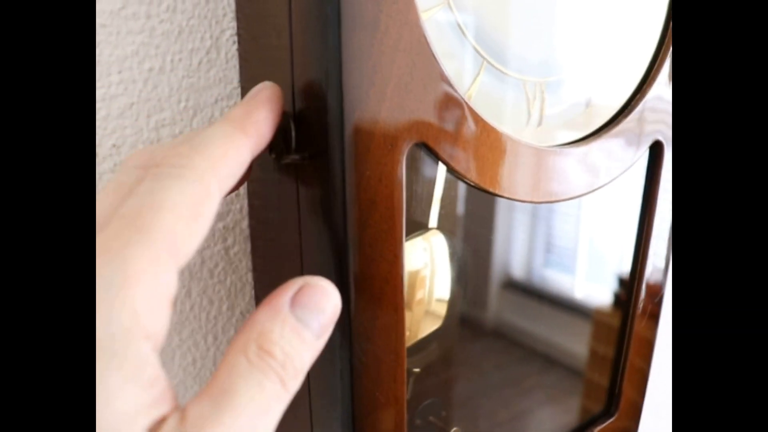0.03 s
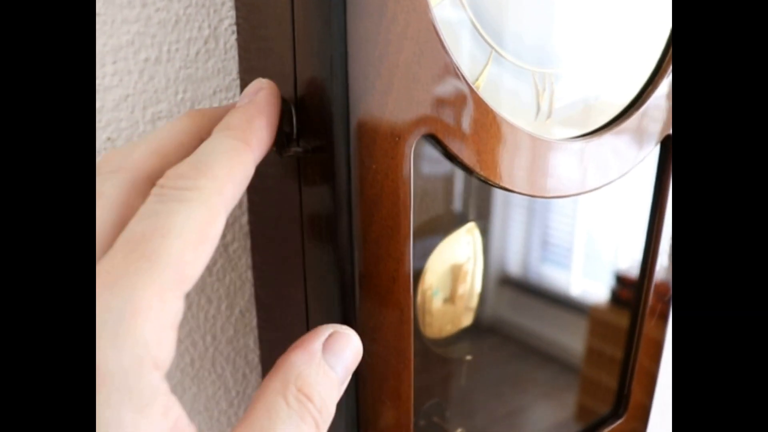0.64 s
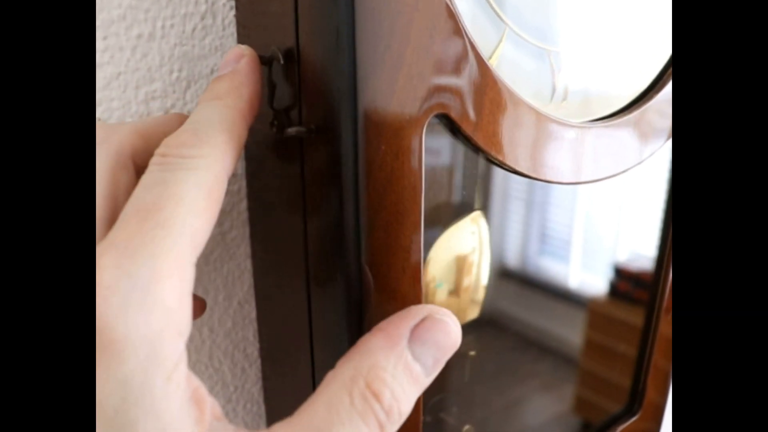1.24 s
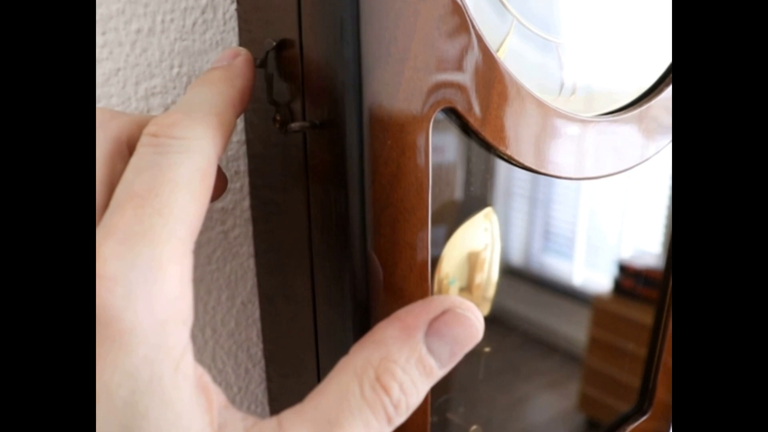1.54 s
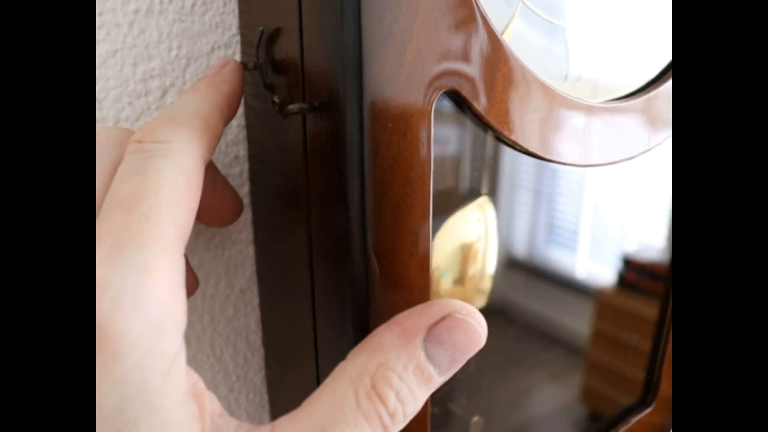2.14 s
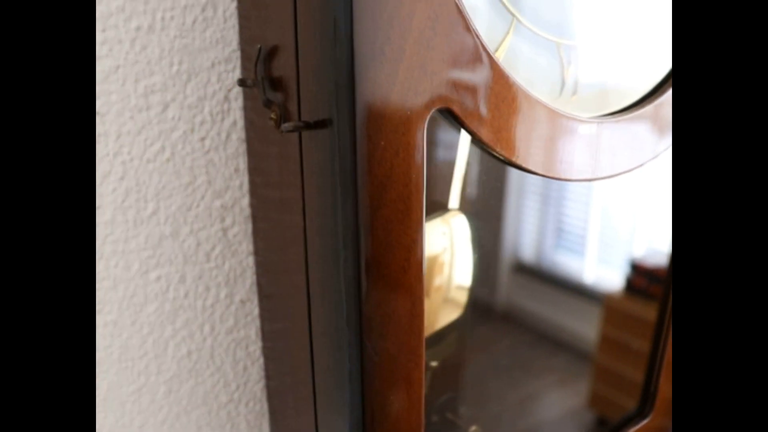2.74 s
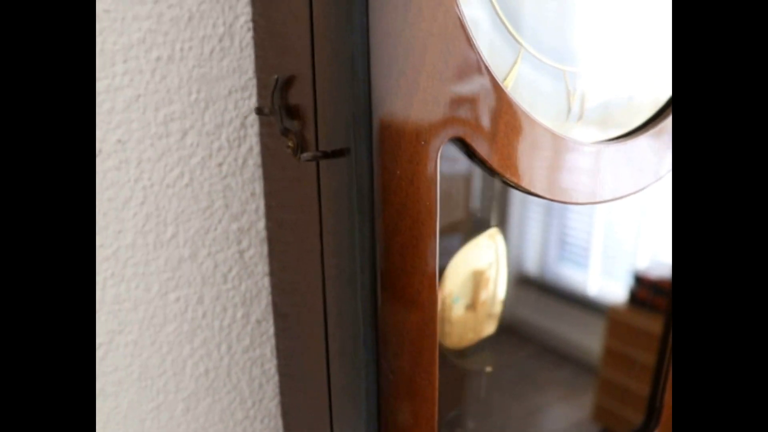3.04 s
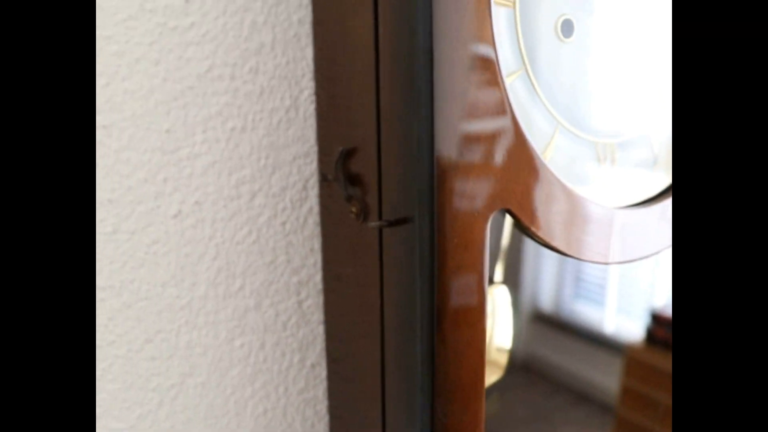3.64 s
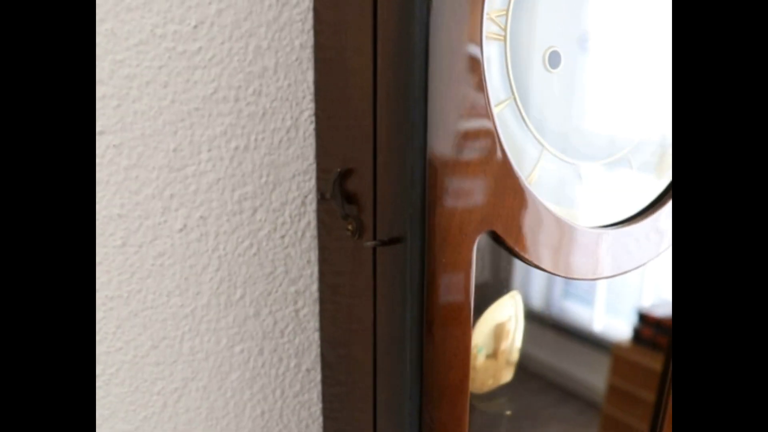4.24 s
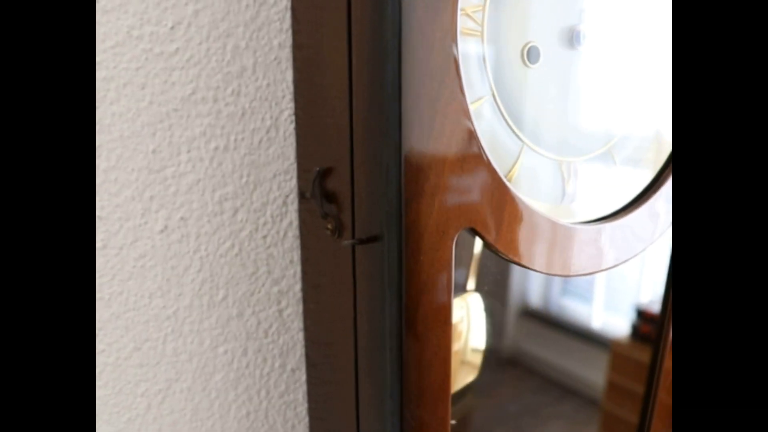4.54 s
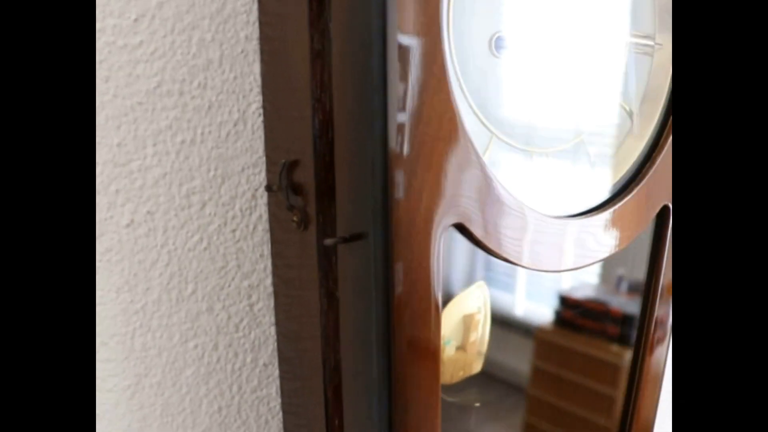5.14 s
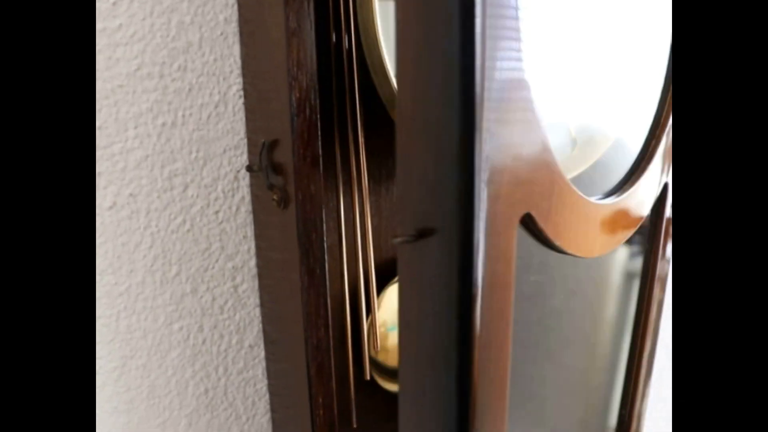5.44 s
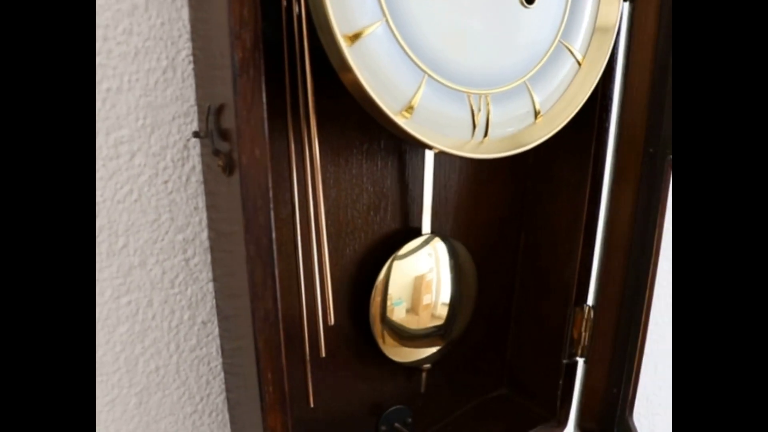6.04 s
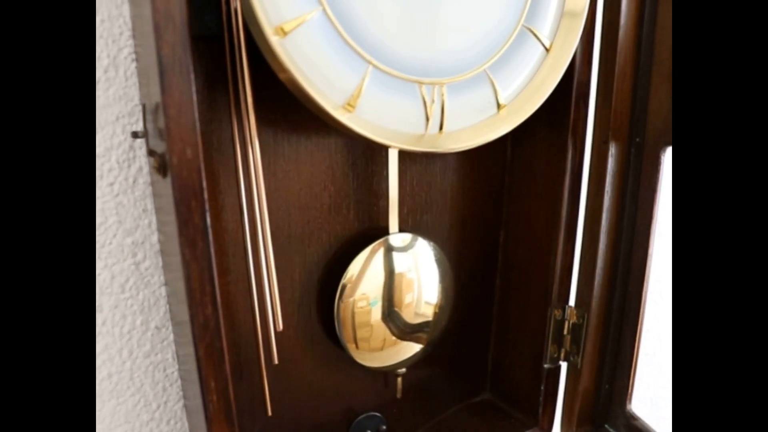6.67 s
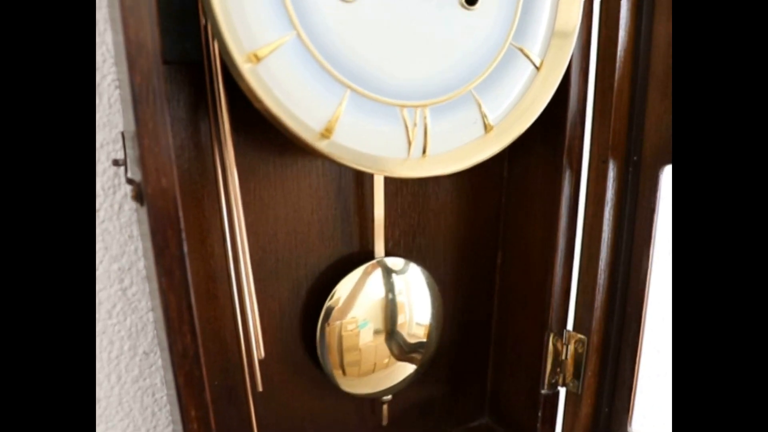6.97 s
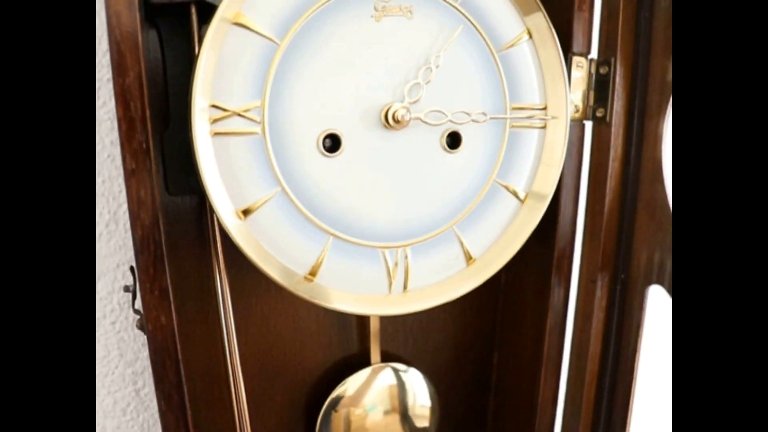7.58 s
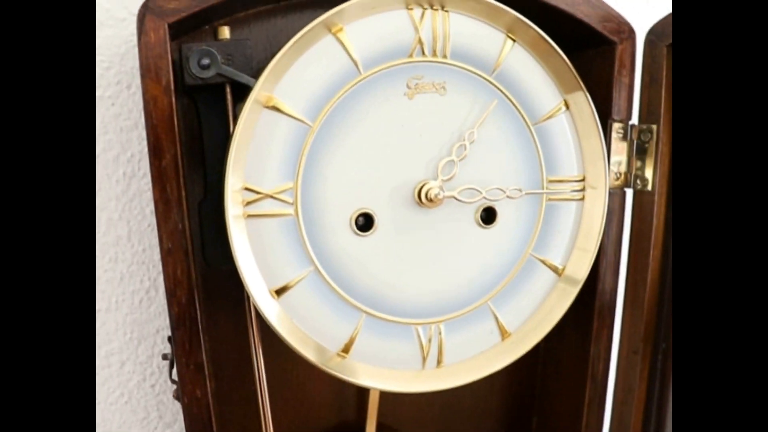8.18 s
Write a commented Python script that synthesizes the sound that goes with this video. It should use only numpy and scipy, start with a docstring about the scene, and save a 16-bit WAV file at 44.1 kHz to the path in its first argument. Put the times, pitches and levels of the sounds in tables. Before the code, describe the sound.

A pendulum wall clock ticks steadily in a quiet room, heard close up. A finger taps lightly on the case, then the door hook snaps free with a loud, hollow wooden knock, leaving a faint hum in the gong rods. Soft hand rubs follow, then a short cluster of scrapes and cracks from the grip on the microphone. In the second half the ticking grows louder and clearer.

```python
"""A pendulum wall clock ticks in a quiet room, its escape wheel ringing the brass movement on each beat.
A finger works the door hook until it snaps free and knocks the wooden case, stirring the gong rods.
The grip shifts on a hand-held camera close by: skin scrapes, and the shell cracks and thuds.
Then the glass door swings open and the ticks come through more clearly."""
import sys
import numpy as np
from scipy import signal
from scipy.fft import rfft, irfft
from scipy.io import wavfile

SR = 44100
rng = np.random.default_rng(int(sys.argv[2]) if len(sys.argv) > 2 else 0)


def inscribe(sig):
    """Save sig as 16-bit PCM at rate SR to the path in sys.argv[1].

    A 1-D sig is mono; a 2-D sig holds one channel per row.
    Samples are clipped to [-1, 1] before scaling.
    """
    pcm = np.round(np.clip(np.atleast_2d(sig).T, -1, 1) * 32767)
    wavfile.write(sys.argv[1], SR, pcm.astype(np.int16))


N = 366471
TIME = np.arange(N) / SR


def amp(db):
    """Decibels to gain."""
    return 10 ** (np.asarray(db) / 20)


def unit(x):
    """Scale to rms 1."""
    return x / np.sqrt(np.mean(x ** 2))


def hit(x):
    """Scale a short sound so that its energy equals 10 ms at rms 1."""
    return x * np.sqrt(SR / 100 / np.mean(np.sum(x ** 2, axis=-1)))


def swell(x, width_s):
    """Scale a bell-shaped swell so that its top has an rms of about 1."""
    return hit(x) * np.sqrt(100 * np.sqrt(np.pi) * width_s)


def noise(t):
    """Two unrelated white noises over the times t."""
    return rng.standard_normal((2, len(t)))


def fade(t, t60):
    """Free decay, 60 dB down after t60 seconds."""
    return np.exp(-np.log(1000) * t / t60)


def eq(x, points):
    """Causal filter through (Hz, dB) points, made from the cepstrum of its gain."""
    hz, db = np.transpose(points)
    size = 4096
    bins = np.maximum(np.fft.rfftfreq(size, 1 / SR), 1)
    gain = amp(np.interp(np.log(bins), np.log(hz), db))
    cepstrum = irfft(np.log(gain))[:size // 2]
    cepstrum[1:] *= 2
    impulse = irfft(np.exp(rfft(cepstrum, size)))
    return np.apply_along_axis(signal.fftconvolve, -1, x, impulse)[..., :x.shape[-1]]


def resonate(x, hz, q):
    """One resonance, applied twice for steep skirts."""
    b, a = signal.iirpeak(hz, max(q, .5), fs=SR)
    return signal.lfilter(b, a, signal.lfilter(b, a, x))


def ring(modes, t, scatter_db, detune=0):
    """Decaying modes as mid and side; each strike weights them anew and can detune them slightly."""
    out = 0
    for hz, db, t60 in modes:
        weight, bend = rng.standard_normal(2)
        phase = np.array([[0], [rng.uniform(0, 2 * np.pi)]])
        tone = np.sin(2 * np.pi * hz * (1 + detune * bend) * t + phase)
        out = out + amp(db + scatter_db * weight) * fade(t, t60) * tone
    return out


def add(out, x, s, db, pan_db=0):
    """Mix a stereo sound in at s seconds; pan_db is left minus right."""
    start = max(int(s * SR), 0)
    part = x[:, :max(out.shape[1] - start, 0)]
    out[:, start:start + part.shape[1]] += part * amp(db + np.array([[pan_db], [-pan_db]]) / 2)


# Image of close sounds, near mono in the bass. Each row: frequency in Hz, side minus mid in dB.
NEAR_WIDTH = [(100, -33), (300, -22), (700, -7.5), (1400, -6.5), (4000, -3.5), (12000, 0)]
def stereo(pair, width=NEAR_WIDTH):
    """Left and right from a mid and a side signal."""
    side = eq(pair[1], width)
    return np.array([pair[0] + side, pair[0] - side])


def room(x, t60, wet_db):
    """Walls and furniture add a short diffuse tail, duller than the direct sound."""
    t = TIME[:SR // 2]
    tail = noise(t) * fade(t, t60) * np.minimum(t / 0.0095, 1)
    tail = eq(tail, [(200, -7), (600, -1.5), (4500, -3), (12000, -6.5)])
    tail = stereo(tail / np.sqrt(np.sum(tail ** 2)))
    return x + amp(wet_db) * signal.fftconvolve(x, tail, axes=1)[:, :N]


# Tone of the quiet room. Each row: frequency in Hz, relative level in dB.
AIR_EQ = [(15, -65), (25, -2.5), (69, -7), (104, -3.5), (160, -4), (215, -3), (331, -3.5), (410, -5),
          (509, -6.5), (945, -10), (1170, -9.5), (1710, -13), (7500, -19), (15500, -26.5)]
# Its wide image. Each row: frequency in Hz, side minus mid in dB.
AIR_WIDTH = [(60, -5.5), (110, -2), (200, -2.5), (380, -3), (700, -1), (1290, -1), (2380, 0), (4400, -0.5),
             (8120, -1), (15000, -1)]
def room_tone():
    """A steady bed of low rumble and soft hiss."""
    return stereo(unit(eq(noise(TIME), AIR_EQ)), AIR_WIDTH) * amp(-58)


def stick_slip(width_s, grain_db):
    """A swell of tiny friction catches, loudest three widths after its start."""
    t = TIME[:int(6 * width_s * SR) + SR // 20]
    catches = np.repeat(amp(grain_db * rng.standard_normal(len(t))), SR // 1500)[:len(t)]
    bell = np.exp(-((t / width_s - 3) ** 2) / 2)
    return noise(t) * catches * bell


# Soft hand rubs. Each row: peak time in seconds, level in dB, swell width in seconds, drone in Hz.
RUBS = [(0.437, -56, .046, 237), (1.925, -47.5, .014, 331), (1.969, -51, 0.0095, 320),
        (1.97, -53, 0.023, 213), (4.27, -60.5, .22, 334), (4.35, -63.5, .24, 465), (5.253, -66.5, .1, 380),
        (6.21, -64.5, .06, 197), (7.082, -61, 0.086, 327)]
def rubs():
    """Hands rub the wood and the camera body into a low drone under a faint rustle of skin."""
    out = np.zeros((2, N))
    for s, db, width_s, hz in RUBS:
        drag = stick_slip(width_s, grain_db=2.5)
        drone = hit(resonate(drag, hz, q=5.3))
        rustle = amp(-10.5) * hit(resonate(drag, 1120, q=.7))
        add(out, swell(stereo(drone + rustle), width_s), s - 3 * width_s, db)
    return out


# Tone of the camera shell. Each row: frequency in Hz, gain in dB.
SHELL_EQ = [(40, -5), (150, -5), (400, -6.5), (800, 1), (1100, -4.5), (1550, 0), (1980, 6), (2230, -1),
            (2520, 3), (4400, -3), (6000, -6.5), (10000, -12), (16000, -23)]
def shell(x, squeak_hz, squeak_db, q, tilt_db_per_octave=0):
    """The camera shell carries a sound with one squeak standing out; higher squeaks come brighter."""
    tilt = tilt_db_per_octave + 3.8 * np.log2(squeak_hz / 2100)
    body = eq(x, [(hz, db + tilt * np.log2(np.clip(hz / 2000, .5, 4))) for hz, db in SHELL_EQ])
    return body + amp(squeak_db) * resonate(body, squeak_hz, q)


# Skin scrapes. Each row: peak time in seconds, level in dB, swell width in seconds, squeak in Hz,
# left minus right in dB.
SCRAPES = [(1.585, -55.5, 0.014, 5750, 1), (1.752, -53.5, 0.011, 6060, 4), (3.188, -51, .017, 5300, 2),
           (3.234, -40, .019, 1780, 4), (3.482, -55, 0.044, 2750, -4), (3.556, -47, 0.018, 3150, -10),
           (3.66, -46.5, .007, 3700, -4), (3.706, -48.5, .028, 6550, -9), (3.783, -39, 0.018, 2500, -6)]
def scrapes():
    """Skin drags on the hook, then on the camera: high squeaks hiss, low ones rasp."""
    out = np.zeros((2, N))
    for s, db, width_s, hz, pan_db in SCRAPES:
        drag = shell(stick_slip(width_s, grain_db=3), hz, squeak_db=-3.5, q=2.9)
        add(out, swell(drag, width_s), s - 3 * width_s, db, pan_db)
    return out


# Ring of the camera shell. Each row: pitch in Hz, relative level in dB, t60 in seconds.
SHELL_MODES = [(805, -2, 0.086), (1430, -0.5, 0.053), (1590, -14, .07), (1826, -4, 0.051),
               (1985, -5, 0.099), (2766, -4, 0.13), (4170, -2, .06)]
# Thud of the camera body. Each row: frequency in Hz, relative level in dB.
THUD_EQ = [(25, -20), (70, -2), (200, -2.5), (600, -7), (2000, -25.5)]
# Jerks of the grip. Each row: start in seconds, level in dB, squeak in Hz, thud against crack in dB,
# left minus right in dB.
JERKS = [(3.222, -33, 1680, -18, 2.5), (3.573, -50, 3100, -10, -9), (3.636, -50, 3470, -22, -11),
         (3.647, -51, 3170, -22, -13), (3.671, -46, 2870, -0.5, -2), (3.7141, -42, 2620, -3, -3),
         (3.7796, -32.5, 1430, -31, -1), (3.804, -40, 3100, -16, 4)]
def grip_jerks():
    """The grip lets go in jerks; each cracks and rings in the shell and thuds in the camera body."""
    out, t = np.zeros((2, N)), TIME[:SR // 6]
    for s, db, hz, thud_db, pan_db in JERKS:
        t60 = 0.032 * 2 ** ((db + 40) / 14)  # 14 dB harder lasts twice as long
        envelope = np.minimum(t / 0.0011, 1) * fade(t, t60)
        crack = hit(shell(noise(t) * envelope, hz, squeak_db=2, q=1.7, tilt_db_per_octave=-1))
        ringing = hit(ring(SHELL_MODES, t, scatter_db=2.5))
        thud = hit(stereo(eq(noise(t) * envelope, THUD_EQ)))
        add(out, crack + amp(-5.5) * ringing + amp(thud_db) * thud, s, db, pan_db)
    return out


# Light taps on the case. Each row: start in seconds, level in dB, centre of the click in Hz.
TAPS = [(.02, -45.5, 1740), (.204, -47, 1470), (0.3353, -39.5, 2960), (.397, -55, 1000), (.428, -52, 1380),
        (.477, -49, 610), (1.583, -53, 550), (8.177, -45.5, 1400)]
def taps():
    """Fingertip, hook and door touch the case: a click, then the ring of the wooden panel."""
    out, t = np.zeros((2, N)), TIME[:SR // 4]
    for s, db, hz in TAPS:
        click = hit(resonate(noise(t) * fade(t, 74 / hz), hz, q=1))  # dies within 74 cycles
        wood = hit(resonate(noise(t) * fade(t, 0.28), 1150, q=0.5))
        add(out, hit(stereo(click + amp(-0.5) * wood)), s, db)
    return out


# Crack of hook on wood. Each row: frequency in Hz, relative level in dB.
CRACK_EQ = [(30, -32), (80, -18), (170, -9), (350, 1.5), (600, 2.5), (1000, -3.5), (1500, -11),
            (2300, -26.5), (4000, -34.5), (8000, -47), (15000, -66)]
# Boom of the case, hum of the gong rods. Each row: pitch in Hz, relative level in dB, t60 in seconds.
CASE_MODES = [(125.7, -6.5, 0.35), (155, -6, 0.16), (189.3, 0, 0.33), (212, 8, 0.048), (222, -2, .22),
              (254.5, 0.5, 0.25), (374, -12, 0.235), (468, -17, 0.13), (502, -13, 0.15), (515, -4, .16),
              (546, -2.5, 0.16), (642, -2, 0.16), (680, -3, 0.21), (670, 0, 0.065), (806, -6, 0.12),
              (841, -15, 0.18), (915, -23, 0.12), (1040, -10, 0.1), (1460, -16, 0.11), (1450, -25, .16)]
ROD_MODES = [(228, -7.5, 4), (257, 0, 3.3), (335, 1, 6.1), (1115, -3, 3.4)]
# The hook's double strike. Each row: start in seconds, level in dB.
HOOK_STRIKES = [(0.869, -23), (.8745, -29)]
def hook():
    """The freed hook cracks against the case; the panels boom and the gong rods hum on."""
    out, t = np.zeros((2, N)), TIME[:SR // 2]
    for s, db in HOOK_STRIKES:
        crack = eq(noise(t) * (fade(t, 0.023) + amp(-7) * fade(t, 0.22)), CRACK_EQ)
        add(out, hit(stereo(crack)), s, db)
    knock_s = HOOK_STRIKES[0][0]
    panels = hit(stereo(ring(CASE_MODES, t, scatter_db=-0.2)))
    add(out, panels, knock_s, db=-17.5)
    rods = stereo(ring(ROD_MODES, TIME[:3 * SR], scatter_db=3))
    add(out, rods, knock_s, db=-58.5)
    low_cut = signal.butter(4, 125, "highpass", fs=SR, output="sos")  # a small case has no deep bass
    return signal.sosfilt(low_cut, out + 1e-18)


# Ping of the crutch. Each row: pitch in Hz, relative level in dB, t60 in seconds.
CRUTCH_MODES = [(3090, 5.5, 0.04), (3980, -4, 0.026), (5360, -33, 0.028), (5780, -14, 0.024)]
# Slips heard once the door opens. Each row: start in seconds, level in dB.
CRUTCH_SLIPS = [(5.386, -58.5), (6.285, -50.5), (7.192, -47.5), (8.101, -51.5)]
def crutch():
    """The pendulum slips in its crutch just before a tock: a dry little scratch and a faint ping."""
    out, t = np.zeros((2, N)), TIME[:SR // 8]
    attack = np.minimum(t / 0.0013, 1)
    for s, db in CRUTCH_SLIPS:
        scratch = hit(resonate(noise(t) * fade(t, 0.11), 4900, q=1))
        ping = hit(ring(CRUTCH_MODES, t, scatter_db=4, detune=0.007))
        add(out, stereo(ping + amp(-2) * scratch) * attack, s, db)
    return out


# Resonances coming straight out of the open case. Each row: centre in Hz, Q, send level in dB.
CASE_RESONANCES = [(1000, 5.7, 5), (3050, 8, -6), (5100, 7.3, -14)]
def open_case(x):
    """While the camera faces the open case, its resonances stand out."""
    middle_s, half_span_s, fade_s = 6.8, .85, .3
    facing = np.clip((half_span_s - np.abs(TIME - middle_s)) / fade_s, 0, 1)
    return x + facing * sum(amp(db) * resonate(x + 1e-18, hz, q) for hz, q, db in CASE_RESONANCES)


# The camera's path across the clock. Each row: time in seconds, level in dB, low-mid lift in dB,
# treble lift in dB, left minus right in dB.
CAMERA_PATH = [(0, 0, 2.5, -1, 0.5), (2.8, 1.2, 0, -1, 2), (4.6, 2, -4.5, -3.5, 0.5),
               (6.8, 1.1, -1.5, -4, -1), (7.7, 0, -6, -9, -2), (8.2, -1.4, 3, 0.5, -2.5)]
def perspective(times, db, treble_db):
    """One row a beat, laid out like the path: the camera shapes it and the opening door lifts it."""
    opens_s, swing_s, open_db = 4.88, 1.8, 5.5
    when, *columns = np.transpose(CAMERA_PATH)
    near, low_mid, treble, pan = (np.interp(times, when, column) for column in columns)
    door = np.clip((times - opens_s) / swing_s, 0, 1)
    low_mid = low_mid - 1.4 * rng.standard_normal(len(times))  # varies from beat to beat
    return np.transpose([times, db + near + open_db * door, low_mid, treble_db + treble, pan])


def pendulum():
    """Times of the ticks and tocks, one each a period; the tick comes early and slowly evens out."""
    first_tock_s, period_s, tick_lag_s, lag_growth_s = .0611, .89954, .4304, .00085
    swing = np.arange(int(N / SR / period_s) + 1)
    wobble_s = .0021 * np.cos(2 * np.pi * swing / 5)  # the escape wheel runs slightly out of true
    tocks = first_tock_s + period_s * swing + wobble_s
    ticks = tocks + tick_lag_s + lag_growth_s * swing
    return ticks[ticks < N / SR], tocks[tocks < N / SR]


def pallet(beats, contacts, spectrum, modes, ring_t60, modes_db, echo_db, echo_t60):
    """Each contact of wheel and pallet rings the brass movement, which echoes briefly in the case."""
    out, t = np.zeros((2, N)), TIME[:SR // 4]
    click = amp(-1) * fade(t, 0.0048)
    envelope = click + fade(t, ring_t60) + amp(echo_db) * fade(t, echo_t60)
    movement = noise(t)  # the same metal answers every beat
    for s, db, low_mid_db, treble_db, pan_db in beats:
        beat = np.zeros((2, len(t)))
        for delay, contact_db in contacts:
            dense = hit(eq((movement + 0.76 * noise(t)) * envelope, spectrum))
            clear = amp(modes_db) * hit(ring(modes, t, scatter_db=5.5, detune=0.0071))
            add(beat, dense + clear, delay * rng.uniform(.94, 1.06), contact_db + rng.standard_normal())
        snap = hit(resonate(noise(t) * fade(t, 0.023), 14200, q=1.5))
        add(beat, snap, contacts[0][0], db=-6.5)  # steel on steel, only at the landing
        shelves = [(1200, low_mid_db), (3000, low_mid_db / 2), (4200, 0), (6000, 0), (11000, treble_db)]
        add(out, hit(eq(stereo(beat), shelves)), s, db, pan_db)
    return out


# The wheel lands, slides and rebounds. Each row: seconds after landing, relative level in dB.
TICK_CONTACTS = [(0, 3.5), (.0024, 6.5), (0.0113, 2.5), (0.019, -12)]
TOCK_CONTACTS = [(0, 2), (.0022, -10.5), (0.0127, -5), (0.021, -5)]
# Dense ring of the movement. Each row: frequency in Hz, relative level in dB.
TICK_EQ = [(300, -43), (900, -3.5), (1800, 1), (2400, -6), (3000, 1.5), (5200, 5), (5800, -6), (8400, -9.5),
           (9300, -1.5), (11000, -2), (11800, -13), (13300, 0), (14600, -7), (16000, -12)]
TOCK_EQ = [(300, -15), (700, -9), (1000, -0.5), (1500, -6.5), (2500, -5.5), (3100, 3), (4200, 1),
           (5700, -12), (7500, -6.5), (9800, -17), (11000, -8), (11800, -8), (13000, -6), (14000, -26),
           (16000, -35)]
# Clear ring of brass plates and dial. Each row: pitch in Hz, relative level in dB, t60 in seconds.
TICK_MODES = [(862, -10, 0.038), (1120, -3, .12), (1443, -5, 0.077), (1833, -12, 0.06), (3120, -6, 0.02),
              (4200, -1.5, 0.062), (5330, -8.5, 0.15), (9500, -20, .05), (9310, -0.5, 0.036),
              (10700, -3.5, 0.06)]
TOCK_MODES = [(975, -10, 0.07), (1120, -1.5, 0.13), (1933, -7, 0.12), (2950, 4.5, 0.029), (4075, 7, 0.054),
              (4290, -1.5, 0.062), (3630, -8, 0.079), (5170, -11, 0.14), (7700, -11, 0.14),
              (9080, -3, 0.068), (10330, -4, 0.058), (12600, -22, .09)]
def escapement():
    """The escape wheel lands on two pallets in turn: a short, bright tick and a longer, darker tock."""
    ticks, tocks = pendulum()
    tick = pallet(perspective(ticks, db=-43, treble_db=-1), TICK_CONTACTS, TICK_EQ, TICK_MODES,
                  ring_t60=0.031, modes_db=-5, echo_db=-19, echo_t60=0.078)
    tock = pallet(perspective(tocks, db=-44, treble_db=2), TOCK_CONTACTS, TOCK_EQ, TOCK_MODES,
                  ring_t60=0.088, modes_db=-1, echo_db=-15, echo_t60=0.098)
    return tick + tock


def scene():
    """Clock, hook and hands, each with its own reverb, over the room tone."""
    clock = room(open_case(escapement()) + crutch(), t60=0.38, wet_db=-9)
    latch = room(hook() + taps(), t60=0.36, wet_db=-11)
    hands = room(scrapes() + grip_jerks() + rubs(), t60=0.1, wet_db=-12.5)
    return clock + latch + hands + room_tone()


def record(dry):
    """A steep low-pass cuts the treble above 15.9 kHz."""
    return signal.sosfilt(signal.ellip(10, .2, 70, 15900, fs=SR, output="sos"), dry)


dry = scene()
out = record(dry)
inscribe(out)
```